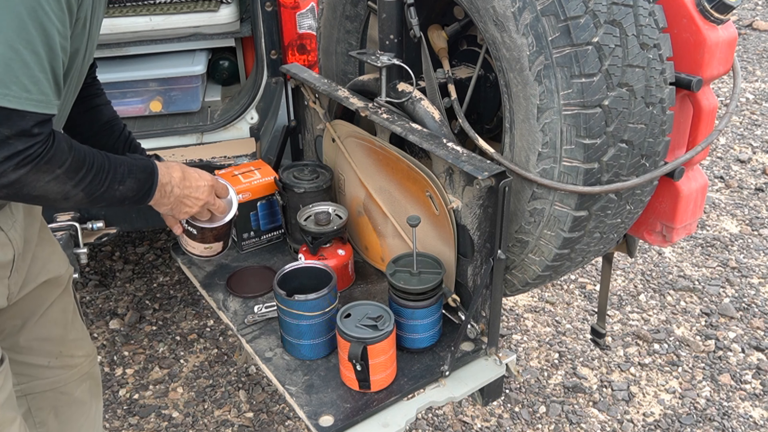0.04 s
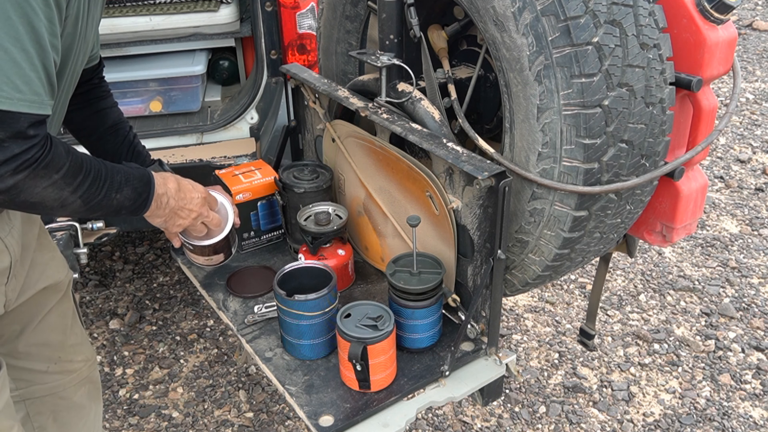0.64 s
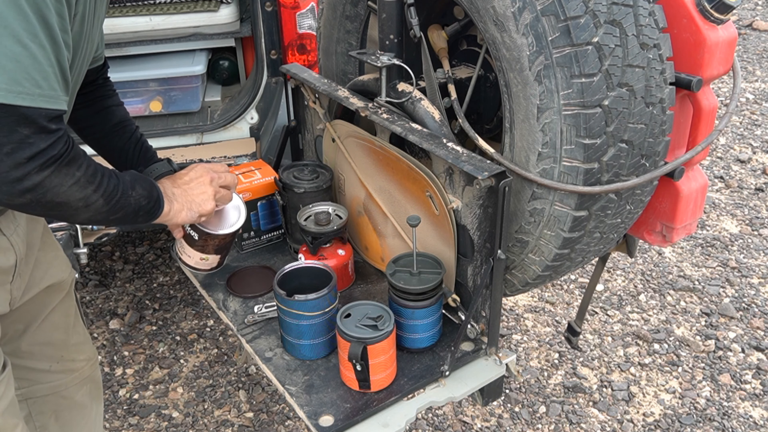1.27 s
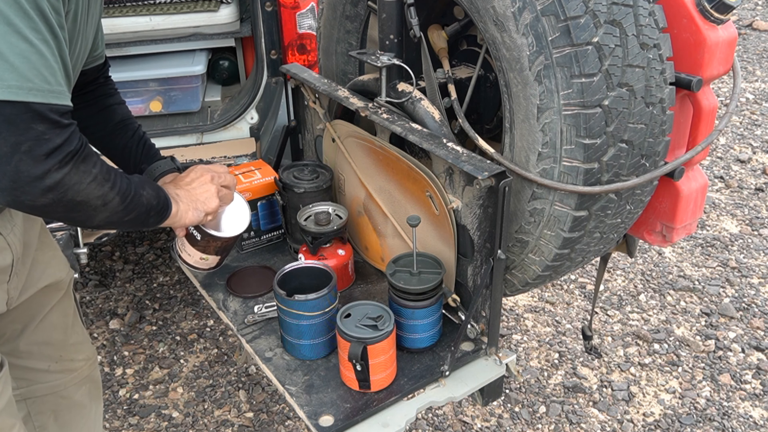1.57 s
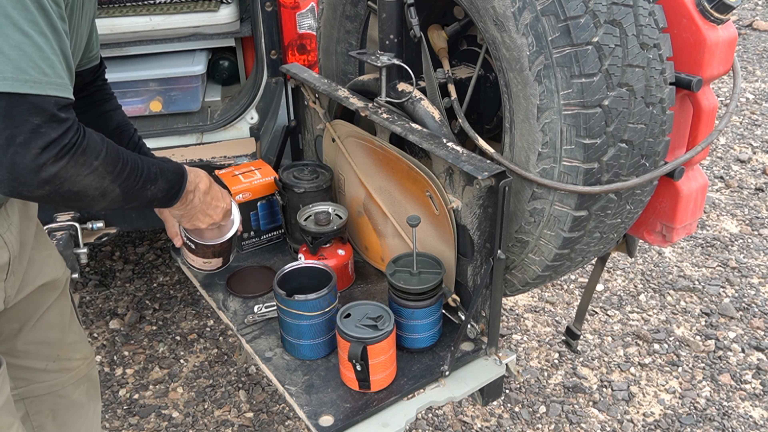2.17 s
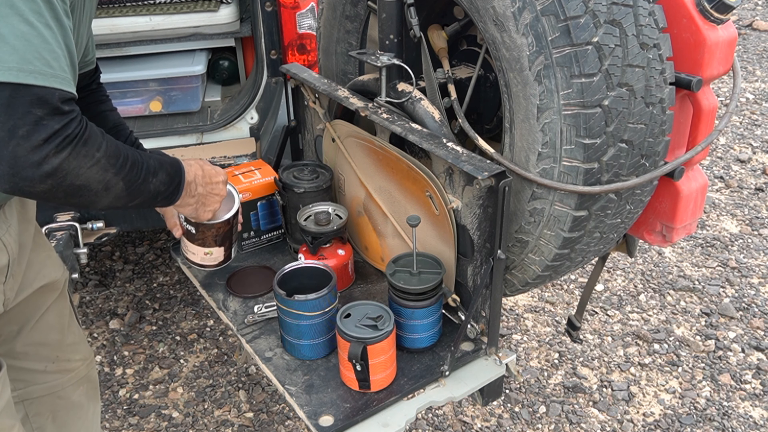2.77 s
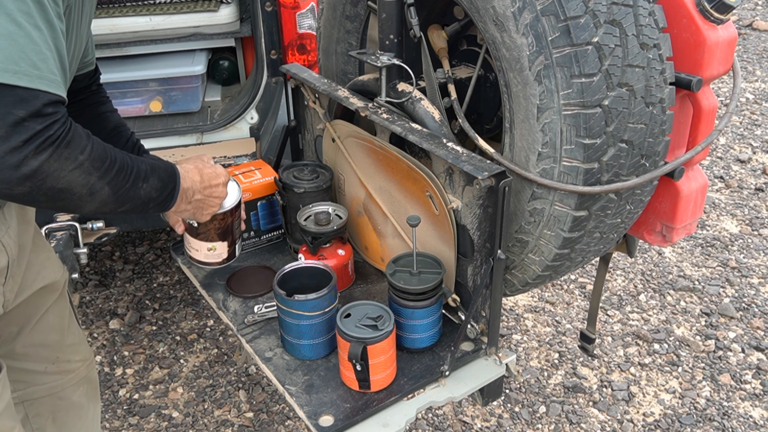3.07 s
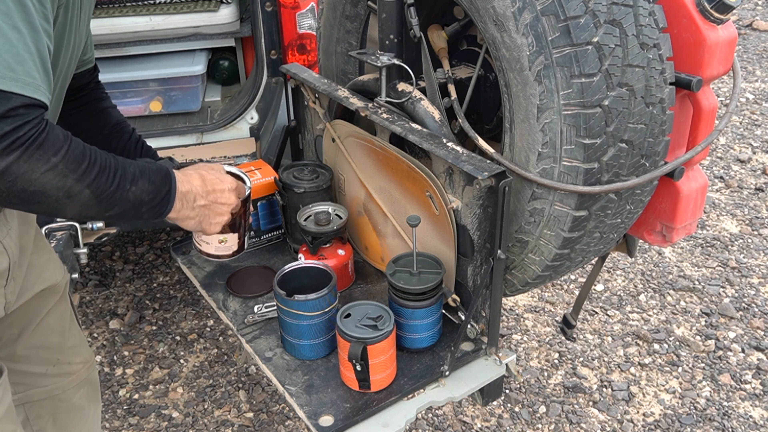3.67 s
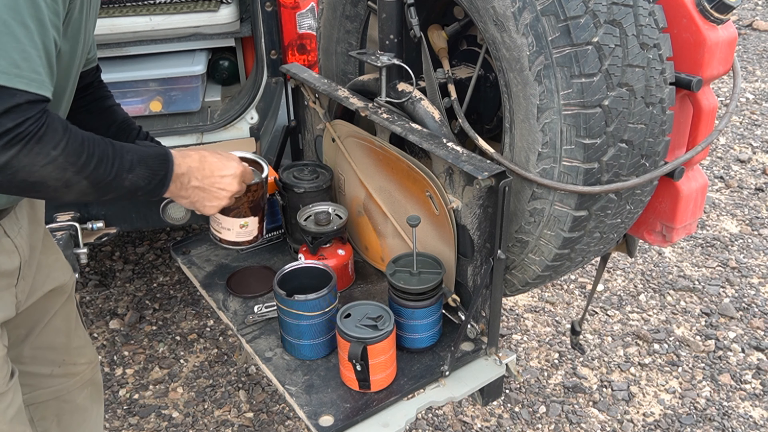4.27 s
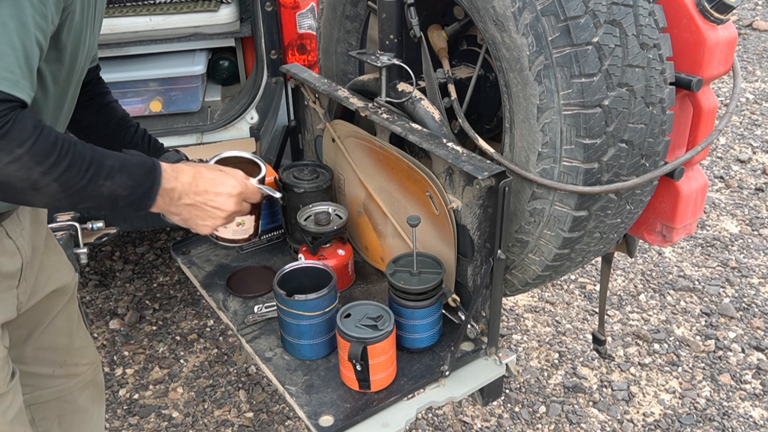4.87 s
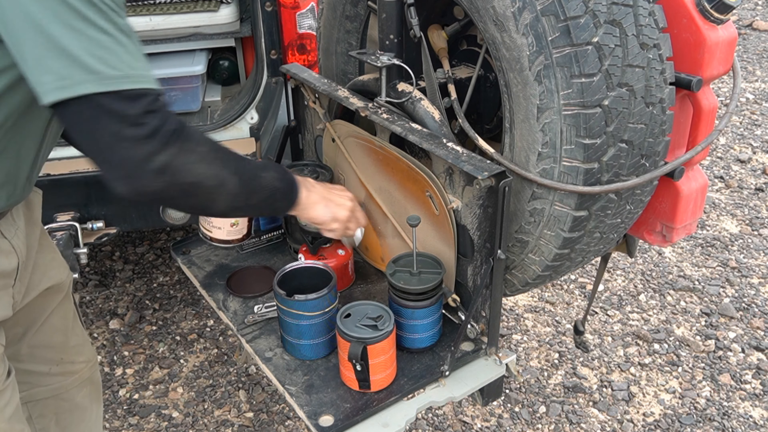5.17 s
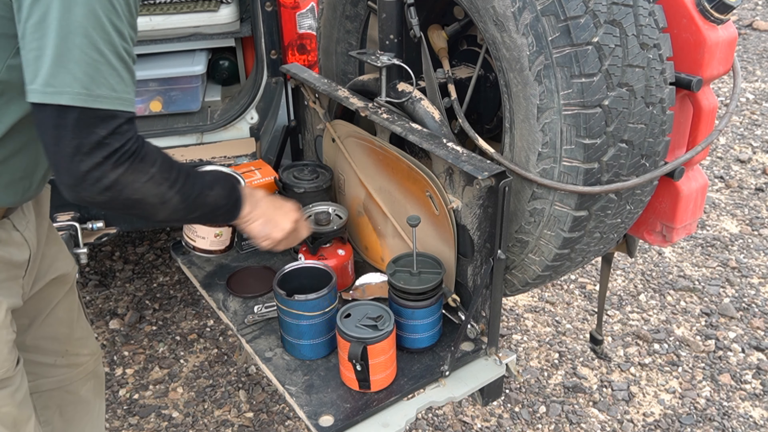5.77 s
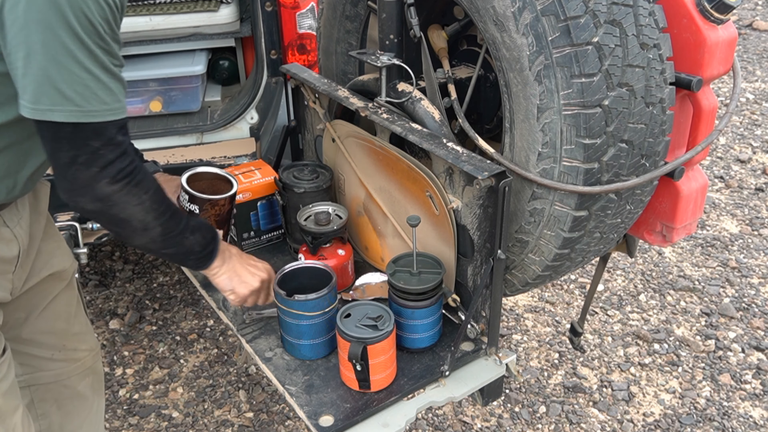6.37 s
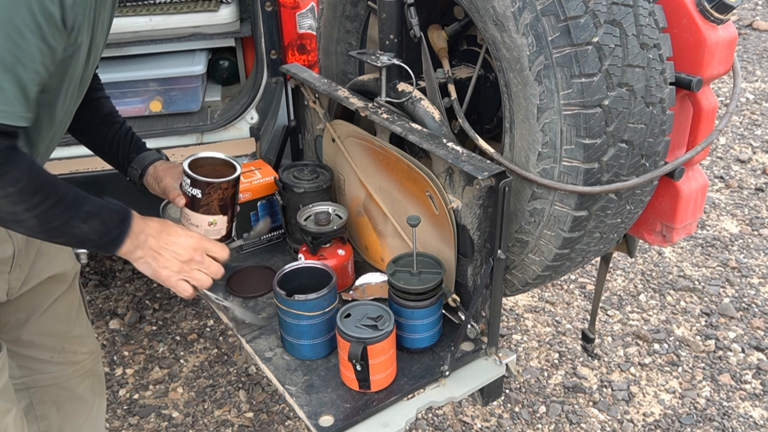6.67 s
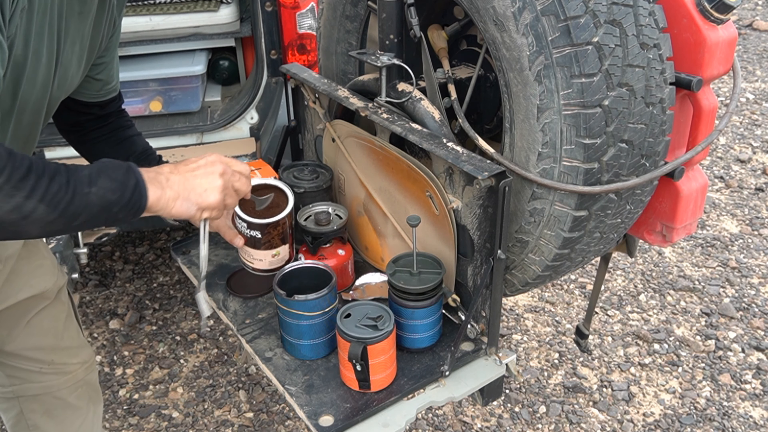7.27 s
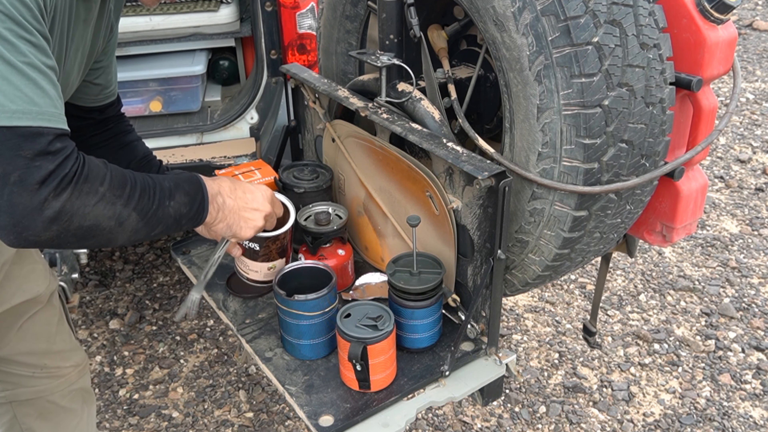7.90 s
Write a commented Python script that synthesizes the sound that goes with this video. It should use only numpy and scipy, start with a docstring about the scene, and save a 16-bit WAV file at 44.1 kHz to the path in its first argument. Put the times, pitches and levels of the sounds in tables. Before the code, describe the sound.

A plastic lid pops off the rim of a coffee can with crisp snaps, among dull handling bumps, brief rubbing and hollow knocks. The lid taps down on a table, and a metal spoon bounces, scrapes across the surface and lightly clinks on the can. Everything is close and on the left, over quiet outdoor air and a faint microphone purr, with the sharpest snaps overloading slightly.

```python
"""Coffee on a tailgate

Outdoors, a coffee can is knocked and rubbed; its plastic lid snaps off the rim and is put down.
A metal spoon clatters on the table, is dragged off it and clinks against the can. Each hit is a burst
of dying noise plus a few clear modes; each scrape is a stream of tiny slips through such a ring.
The close microphone purrs faintly, feeds the left channel only and overloads on the sharpest snaps."""
import sys
import numpy as np
from scipy import signal
from scipy.fft import rfft, irfft
from scipy.io import wavfile
from scipy.ndimage import uniform_filter1d

SR = 44100
rng = np.random.default_rng(int(sys.argv[2]) if len(sys.argv) > 2 else 0)


def master_out(mix):
    """Clip the mix to full scale and print it as 16-bit PCM to the path in sys.argv[1]."""
    frames = np.transpose(np.atleast_2d(mix))
    ceiling = np.clip(frames, -1, 1)
    pcm = np.round(ceiling * 32767).astype(np.int16)
    wavfile.write(sys.argv[1], SR, pcm)


N = 354563
RING_SAMPLES = 16384
T, HZ = np.arange(RING_SAMPLES) / SR, np.fft.rfftfreq(RING_SAMPLES, 1 / SR)  # axes of one ring
TIME = np.arange(N) / SR

# noise beds: f/Hz, density/dB
AIR_SPECTRUM = [(5, -55.5), (20, -80), (50, -71), (100, -69), (200, -73), (500, -78.5), (1000, -81),
                (3000, -84.5), (10000, -87.5), (15500, -88.5)]
HISS_SPECTRUM = [(20, -73), (50, -79.5), (100, -86), (300, -89.5), (1000, -93), (5000, -95), (15500, -96.5)]
# slow swell of the air: t/s, level/dB
AIR_FADER = [(0, -2), (1.5, 0.5), (3, 1), (5, 1), (8, 0.5)]
# dull bumps of hands and can: t/s, level/dB, f/Hz, t60/s
BUMPS = [(0.261, -33, 88, 0.2), (0.449, -31.5, 86, 0.16), (1.389, -32, 55, 0.16), (1.89, -27.5, 172, 0.087),
         (2.397, -26, 59, 0.27), (2.739, -17.5, 54.4, 0.12), (4.786, -25, 150, .07),
         (6.128, -26, 74.7, 0.37), (6.429, -37, 80, 0.41), (7.237, -27.5, 90, 0.045),
         (7.316, -18, 64, 0.11)]
# hits: t/s, level/dB, t60/s, contact/ms, struck spot f/Hz, spot boost/dB
CAN_HITS = [(.446, -31, 0.02, 0.2, 3730, 11), (0.634, -24.5, 0.02, 0.1, 3420, 10),
            (1.389, -37.5, 0.054, 0.074, 4000, 6), (3.0946, -21.5, 0.015, 0.94, 640, 17),
            (3.11, -17, 0.022, 0.48, 1830, 11), (3.277, -2, 0.02, 0.21, 2145, 18.5),
            (3.921, -9.5, 0.03, 0.52, 1280, 5.5), (4.066, -34.5, 0.08, 0.16, 850, 18),
            (4.7818, 1.5, 0.045, 0.088, 4900, 7)]
RIM_SNAPS = [(1.8888, 1, 0.026, 0.052, 8260, 20), (2.7345, -1, 0.081, 0.13, 7000, 16.5)]
LID_LANDINGS = [(5.525, -28.5, 0.17, 0.37, 1760, 20), (5.535, -20.5, 0.059, .11, 1000, 2.5),
                (5.564, -28, 0.2, 0.15, 1650, 25), (5.588, -19, 0.14, 0.13, 1690, 14),
                (5.6645, 4, 0.034, 0.07, 4360, 13.5), (5.7315, -15.5, 0.057, 0.14, 4130, 8.5),
                (5.784, -34, 0.07, 0.33, 3660, 14)]
SPOON_ON_CAN = [(6.724, -20, 0.11, .04, 10500, 21), (6.905, -24.5, 0.029, 0.1, 3730, 10),
                (7.073, -17, 0.067, .04, 6740, 19), (7.095, -18.5, 0.072, 0.036, 10700, 10),
                (7.234, -30, 0.037, 0.14, 13900, 13)]
# the spoon hits the table: t/s, level/dB, t60/s, contact/ms, struck spot f/Hz
SPOON_ON_TABLE = [(6.0854, -11.5, 0.24, 0.094, 1720), (6.1237, -8.5, 0.084, 0.1, 4070),
                  (6.167, -16, 0.039, 0.096, 3220), (6.219, -7, 0.052, 0.2, 1920),
                  (6.280, -12, 0.11, 0.1, 1150), (6.363, -19, 0.044, 0.057, 3500),
                  (6.4271, 0.5, 0.077, 0.076, 1050)]
# the hardest knock's bright, overloaded crack, then its hollow pop:
# delay/s, level against the knock/dB, t60/s, contact/ms, ring f/Hz, ring boost/dB
CRACK_AND_POP = [(0.0005, -0.5, 0.019, .025, 14200, 22), (0.0027, -8, 0.053, 0.45, 820, 8)]
# the lid rubs the can: peak t/s, level/dB, rise/s, fall/s, rubbed spot f/Hz, spot boost/dB
RUB_STROKES = [(1.88, -40, 0.034, 0.0077, 3760, 14), (2.7135, -14.5, 0.0018, 0.0029, 2470, 18),
               (3.839, -31.5, 0.0033, 0.02, 990, -4), (3.884, -22.5, 0.0076, 0.007, 1200, 2),
               (4.255, -33, 0.026, 0.02, 3600, 3), (4.443, -26, 0.0044, 0.026, 1720, 12.5),
               (4.502, -28, 0.035, 0.023, 3200, 9.5)]
# the spoon slides: t/s, length/s, level/dB, swell/(dB/s), contact/ms, hollow panel boost/dB
SPOON_SLIDES = [(6.25, 0.029, -23.5, -130, 0.5, 7), (6.315, 0.13, -29, 6, 0.12, 17),
                (6.485, 0.12, -35, 22, 0.14, -1), (6.588, 0.15, -26.5, 66.5, 0.18, 11.5)]
# tone colours of the dense ringing: f/Hz, level/dB
CAN_COLOUR = [(60, -26), (300, -7.5), (600, -4.5), (1300, 3.5), (2200, -3), (3200, 6), (5000, 0),
              (8000, -5), (15000, -30)]
RUB_COLOUR = [(60, -8), (400, -5.5), (800, -5), (1500, -1.5), (2300, -9.5), (3300, -7), (5000, -10.5),
              (8000, -7), (15000, -21)]
LID_COLOUR = [(60, -3), (250, -10), (700, -10), (1500, -6.5), (2800, -9), (3700, -6.5), (6000, -10),
              (8000, -6), (11000, -4), (15000, -4.5)]
LANDING_COLOUR = [(60, -6.5), (300, -11.5), (620, -5), (1000, -7.5), (2200, -10.5), (3300, -10),
                  (5500, -10), (8000, -16), (15000, -12.5)]
TABLE_COLOUR = [(60, -2.5), (250, -8.5), (400, -8), (600, 0.5), (1000, 2.5), (2000, -2.5), (3500, -6),
                (6000, -11), (9500, -15), (14000, -11)]
SPOON_COLOUR = [(100, 3), (700, -10.5), (2000, -14), (3600, -7.5), (5500, -10.5), (8000, -10.5),
                (12000, -16), (15500, -13)]
# clear modes: f/Hz, level/dB, free t60/s
CAN_PARTIALS = [(389, -22.5, 0.16), (805, -19, 0.056), (1275, -17, 0.016), (1350, -24, 0.041),
                (1816, -22, 0.061), (2160, -16, 0.057), (2880, -34, 0.084), (3240, -40, 0.039),
                (4180, -14, 0.062), (4540, -30, 0.13)]
LID_PARTIALS = [(3365, -21.5, 0.071), (4330, -33, 0.03), (5000, -50, 0.069), (4660, -23, 0.019),
                (6440, -19.5, 0.059), (7650, -32, 0.048), (7400, -13, 0.021), (8100, -24, 0.018),
                (8140, -24, 0.036), (9080, -21, 0.072)]
LANDING_PARTIALS = [(375.6, -20, 0.24), (610, -14.5, 0.17), (1545, -19, 0.12), (1750, -20, 0.21),
                    (2860, -23, 0.08), (3210, -11, 0.067), (3640, -20, 0.085), (3957, -12.5, 0.066),
                    (4460, -26, 0.042), (4640, -18, 0.08), (5280, -30, 0.09), (6150, -14, 0.025)]
TABLE_PARTIALS = [(370, -20, 0.15), (437.3, -20, 0.26), (594, -12.5, 0.17), (646, -17, 0.074),
                  (885, -21.5, 0.24), (1002, -22, 0.2), (1080, -33, .12), (1247, -16.5, 0.19),
                  (1560, -19, 0.12), (1690, -24.5, 0.11), (1792, -21, 0.1), (1882, -17.5, 0.15),
                  (2830, -26, 0.096), (3044, -20, 0.096), (3630, -17, 0.066), (4160, -22.5, 0.064),
                  (5520, -24.5, 0.076), (7370, -27, 0.066)]
SPOON_PARTIALS = [(6950, -14.5, 0.084), (8370, -15, 0.066), (9100, -6.5, .07), (10820, -14, 0.072),
                  (11300, -14, 0.094), (12900, -4, 0.042), (14000, -11, .06), (15800, -11, .08)]


def amp(db):
    """Decibels to gain."""
    return 10 ** (np.asarray(db) / 20)


def unit(x):
    """Scales to an energy of one."""
    return x / np.sqrt(np.sum(x ** 2) + 1e-20)


def eq_curve(points, hz):
    """Gain of a spectrum table on a log-frequency axis."""
    f, db = np.transpose(points)
    return amp(np.interp(np.log(hz + 1), np.log(f + 1), db))


def add(mix, s, sound):
    """Mixes a sound in at time s."""
    part = mix[round(s * SR):][:len(sound)]
    part += sound[:len(part)]


def decay(t60):
    """Envelope that falls 60 dB in t60 seconds."""
    return np.exp(-np.log(1000) * T / max(t60, 1e-3))


def minimum_phase(gain):
    """Causal frequency response: nothing sounds before the hit."""
    log_gain = np.log(np.maximum(gain / gain.max(), 1e-5))
    mirrored = np.r_[log_gain, log_gain[-2:0:-1]]
    return np.exp(np.conj(signal.hilbert(mirrored)))[:len(gain)]


def contact(contact_ms, spot_hz=1000, boost_db=0, width=0.1):
    """What a touch excites: less treble when it lasts longer, and a bell EQ at the spot's pitch."""
    lowpass = 1 / np.sqrt(1 + (HZ * contact_ms / 1000) ** 6)
    return lowpass * (1 + (amp(boost_db) - 1) / (1 + (np.log(HZ / spot_hz) / width) ** 2))


def dense_ring(colour, t60, rise_s, chatter_db=3):
    """Countless overlapping modes: a coloured, dying noise of unit energy."""
    chatter = amp(chatter_db * np.interp(T * 900, np.arange(400), rng.standard_normal(400)))
    envelope = chatter * decay(t60) * (1 - np.exp(-T / rise_s))
    spectrum = rfft(rng.standard_normal(RING_SAMPLES) * envelope)
    broad = np.sqrt(uniform_filter1d(abs(spectrum) ** 2, 161))  # chance sets only the fine comb
    return unit(irfft(spectrum * minimum_phase(colour / broad)))


def clear_ring(modes, drive, scatter_db=4.5):
    """The modes that stand out, as damped sines; every touch shares its force among them anew."""
    out = np.zeros(RING_SAMPLES)
    for hz, db, t60 in modes:
        gain = amp(db + scatter_db * rng.standard_normal()) * np.interp(hz, HZ, drive)
        out += gain * unit(decay(t60) * np.sin(2 * np.pi * (hz * T + rng.random())))
    return out


def body_ring(colour, modes, drive, t60, rise_s):
    """Dense and clear ringing under one touch; a grip that damps one damps the other."""
    tone = eq_curve(colour, HZ)
    dense_gain = np.linalg.norm(tone * drive) / np.linalg.norm(tone)
    held = [(hz, db, min(free_t60, 2.5 * t60)) for hz, db, free_t60 in modes]
    return unit(dense_gain * dense_ring(tone * drive, t60, rise_s) + clear_ring(held, drive))


def strike(hits, colour, modes, rise_s, spot_width):
    """A track of hits, each ringing the whole object."""
    out = np.zeros(N)
    for s, db, t60, contact_ms, spot_hz, boost_db in hits:
        drive = contact(contact_ms, spot_hz, boost_db, spot_width)
        ring = body_ring(colour, modes, drive, t60, rise_s)
        add(out, s, amp(db) * np.linalg.norm(decay(t60)) * ring)
    return out


def rebound(hits, gap_s, gain_db, softer, t60_ratio, body_hz, body_db):
    """The hits, each with a weaker, softer second contact that rings the body."""
    return hits + [(s + gap_s, db + gain_db, t60 * t60_ratio, contact_ms * softer, body_hz, body_db)
                   for s, db, t60, contact_ms, _, _ in hits]


def friction(per_s, spread_db):
    """Tiny slips of uneven size at random moments, rms one."""
    size = amp(spread_db * np.minimum(rng.exponential(1, N), 4)) * rng.choice([-1, 1], N)
    return np.sqrt(N) * unit(size * (rng.random(N) < per_s / SR))


def wander(per_s):
    """A slow random curve of about unit size."""
    return np.interp(TIME * per_s, np.arange(200), rng.standard_normal(200))


def noise_bed(spectrum):
    """Steady noise of a given spectral density."""
    tone = eq_curve(spectrum, np.fft.rfftfreq(N, 1 / SR))
    return irfft(rfft(rng.standard_normal(N)) * tone, N) * np.sqrt(SR / 2)


def outdoor_air():
    """A dark wash of air that swells slightly."""
    return noise_bed(AIR_SPECTRUM) * amp(np.interp(TIME, *np.transpose(AIR_FADER)))


def microphone_purr(bursts_per_s=20, first_s=0.0185, burst_s=0.0197, spike_db=-36, sag_db=-28.5):
    """The microphone draws current in bursts: a spike at each end, and the supply sags in between."""
    current = 1.0 * ((TIME - first_s) % (1 / bursts_per_s) < burst_s)
    current -= current.mean()
    sag = signal.lfilter(*signal.butter(1, 101, fs=SR), current)
    coupling = signal.butter(1, 13, "high", fs=SR)
    return signal.lfilter(*coupling, amp(spike_db) * current - amp(sag_db) * sag)


def hand_bumps():
    """Soft pushes on the can: a few low cycles each, with a quieter, shorter overtone."""
    out = np.zeros(N)
    for s, db, hz, t60 in BUMPS:
        add(out, s, amp(db) * decay(t60) * np.sin(2 * np.pi * hz * T))
        add(out, s, amp(db - 9) * decay(t60 * 0.73) * np.sin(2 * np.pi * hz * 2.33 * T))
    return out


def can_knocks(crack_above_db=-6, crack_below_ms=0.17):
    """Knocks ring the can; the hardest adds a bright, overloaded crack, then a hollow pop."""
    knocks = rebound(CAN_HITS, gap_s=0.004, gain_db=-15, softer=6.2, t60_ratio=0.53,
                     body_hz=1230, body_db=5)
    for s, db, _, contact_ms, _, _ in CAN_HITS:
        if db > crack_above_db and contact_ms < crack_below_ms:
            knocks += [(s + delay, db + part_db, *ring) for delay, part_db, *ring in CRACK_AND_POP]
    return strike(knocks, CAN_COLOUR, CAN_PARTIALS, rise_s=0.0001, spot_width=0.084)


def lid_rubs(contact_ms=0.18):
    """Plastic slips over the can's rim in short strokes."""
    out, slips = np.zeros(N), friction(per_s=6400, spread_db=-4.5)
    for s, db, rise, fall, spot_hz, boost_db in RUB_STROKES:
        stroke = np.exp(-((TIME - s) / np.where(TIME < s, rise, fall)) ** 2 / 2)
        drive = contact(contact_ms, spot_hz, boost_db, width=0.18)
        body = dense_ring(eq_curve(RUB_COLOUR, HZ) * drive, t60=0.016, rise_s=0.0013)
        out += amp(db) * signal.oaconvolve(slips * stroke, body)[:N]
    return out


def lid_snaps():
    """The lid's rim snaps over the can's edge and peels free."""
    snaps = rebound(RIM_SNAPS, gap_s=0.00103, gain_db=-16, softer=4.5, t60_ratio=1.47,
                    body_hz=3700, body_db=22)
    return strike(snaps + lid_peel(), LID_COLOUR, LID_PARTIALS, rise_s=0.00024, spot_width=0.16)


def lid_peel(start_s=2.7145, gap_s=0.0045, db=0.5, t60=0.049, contact_ms=0.08, boost_db=24):
    """Four quick slips, as hits whose pitch sags as the rim slackens."""
    tight_hz, slack_hz, tension_kept = 7400, 4950, 0.34
    pitches = slack_hz + (tight_hz - slack_hz) * tension_kept ** np.arange(4)
    return [(start_s + k * gap_s, db, t60, contact_ms, hz, boost_db) for k, hz in enumerate(pitches)]


def lid_put_down():
    """The lid settles on the table in a flurry of light taps."""
    taps = rebound(LID_LANDINGS, gap_s=0.009, gain_db=-14, softer=1.7, t60_ratio=3.5,
                   body_hz=3250, body_db=2.5)
    return strike(taps, LANDING_COLOUR, LANDING_PARTIALS, rise_s=0.0026, spot_width=0.24)


def table_clatter(spot_boost_db=3.5):
    """The bouncing spoon rings the table."""
    knocks = [(*hit, spot_boost_db) for hit in SPOON_ON_TABLE]
    bounces = rebound(knocks, gap_s=0.012, gain_db=-5.5, softer=1.2, t60_ratio=1.3,
                      body_hz=660, body_db=5.5)
    return strike(bounces, TABLE_COLOUR, TABLE_PARTIALS, rise_s=0.0053, spot_width=0.3)


def spoon_clinks(bowl_db=-4.5, loss_db_per_ms=133, t60=0.073, bowl_ms=0.04, bowl_hz=11470, boost_db=15):
    """The spoon's bowl rings at each table knock, less at soft ones, then clinks on the can."""
    bowl = [(s, db + bowl_db - loss_db_per_ms * contact_ms, t60, bowl_ms, bowl_hz, boost_db)
            for s, db, _, contact_ms, _ in SPOON_ON_TABLE]
    return strike(SPOON_ON_CAN + bowl, SPOON_COLOUR, SPOON_PARTIALS, rise_s=0.0045, spot_width=0.025)


def spoon_drag(attack_s=0.0053, release_s=0.03, hollow_hz=356, rasp_db=-17, sing_knee_db=-18):
    """The sliding spoon rings the table anew at each place; its edge catches, rasps and sings."""
    out = np.zeros(N)
    slips, catches = friction(per_s=1200, spread_db=4.5), friction(per_s=500, spread_db=0.5)
    damped = [(hz, db - 3, t60) for hz, db, t60 in TABLE_PARTIALS]  # under the spoon's weight
    glints = [amp(4 * wander(per_s=24)) for _ in SPOON_PARTIALS]  # the bowl rolls as it slides
    for start, length, level_db, swell_db_per_s, contact_ms, hollow_db in SPOON_SLIDES:
        during = round(start * SR) + np.arange(RING_SAMPLES)
        grip = np.exp(-(np.maximum(T - length, 0) / release_s) ** 2 / 2)
        lift = np.sqrt(1 - grip ** 2)
        swell = amp(level_db + swell_db_per_s * np.minimum(T, length))
        pressure = np.minimum(T / attack_s, 1) * swell * grip
        for share, ms in (grip, contact_ms), (lift, contact_ms * 1.6):  # lifting softens the touch
            drive = contact(ms, hollow_hz, hollow_db, width=0.046)
            table = body_ring(TABLE_COLOUR, damped, drive, t60=0.094, rise_s=0.0005)
            add(out, start, signal.fftconvolve(slips[during] * pressure * share, table))
        edge = catches[during] * pressure
        rasp = dense_ring(eq_curve(SPOON_COLOUR, HZ) * contact(contact_ms / 4), t60=0.006, rise_s=0.0002)
        add(out, start, amp(rasp_db) * signal.fftconvolve(edge * grip, rasp))
        singing = edge * (pressure / amp(sing_knee_db)) ** 0.45  # it sings only when pressed
        edge_drive = contact(contact_ms / 2)  # the edge is harder than the table
        for (hz, db, t60), glint in zip(SPOON_PARTIALS, glints):
            partial = clear_ring([(hz, db - 12, t60 * 0.33)], edge_drive)
            add(out, start, signal.fftconvolve(singing * glint[during], partial))
    return out


def scene():
    """All the action is on the left; the right holds only faint hiss."""
    bed = outdoor_air() + microphone_purr()
    can = hand_bumps() + can_knocks()
    lid = lid_rubs() + lid_snaps() + lid_put_down()
    spoon = table_clatter() + spoon_clinks() + spoon_drag()
    return np.array([bed + can + lid + spoon, noise_bed(HISS_SPECTRUM)])


def record(dry, ceiling=0.79, cutoff_hz=15800):
    """The input overloads on the hardest peaks, then a steep low-pass trims the top."""
    lowpass = signal.firwin(511, cutoff_hz, window=("kaiser", 9), fs=SR)
    return signal.oaconvolve(np.clip(dry, -ceiling, ceiling), lowpass[None], "same")


dry = scene()
out = record(dry)
master_out(out)
```